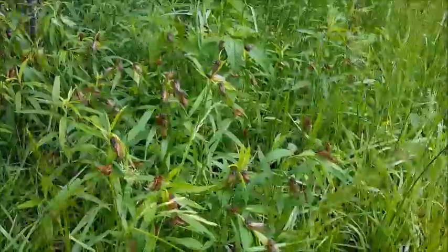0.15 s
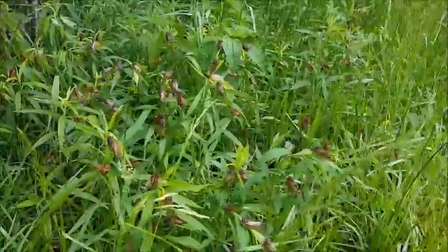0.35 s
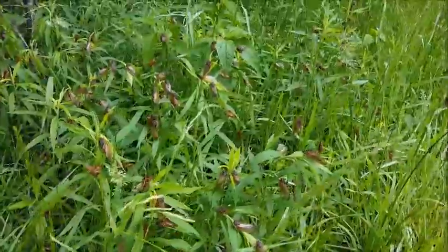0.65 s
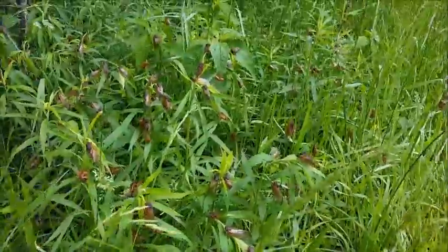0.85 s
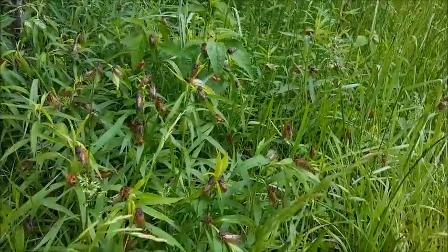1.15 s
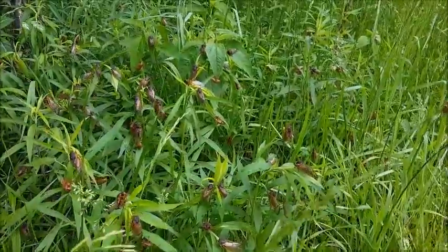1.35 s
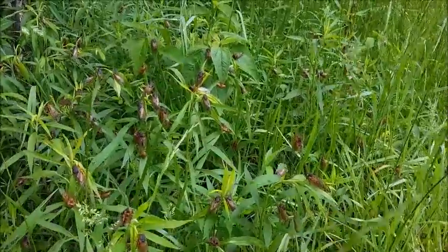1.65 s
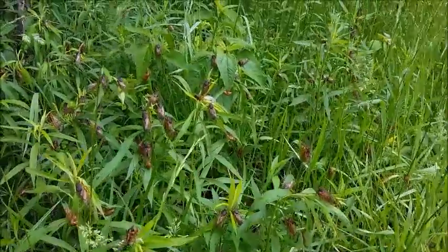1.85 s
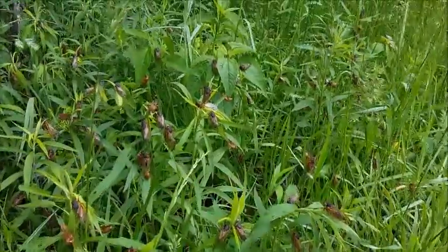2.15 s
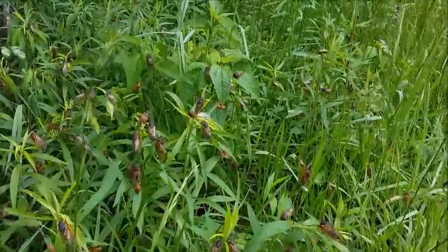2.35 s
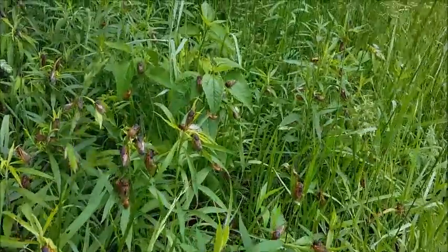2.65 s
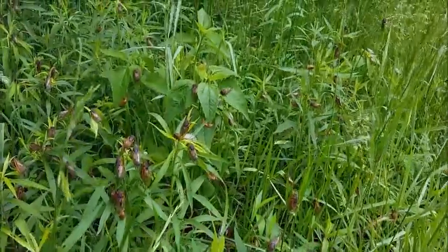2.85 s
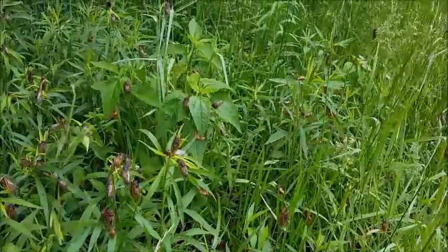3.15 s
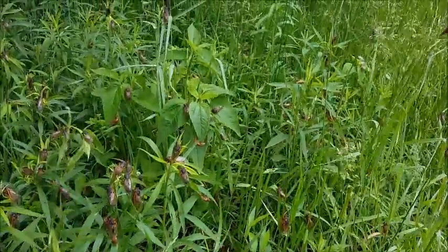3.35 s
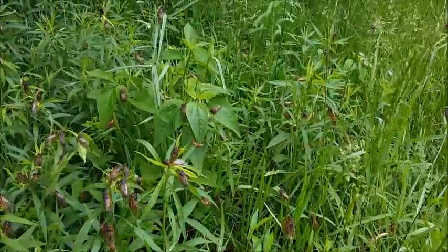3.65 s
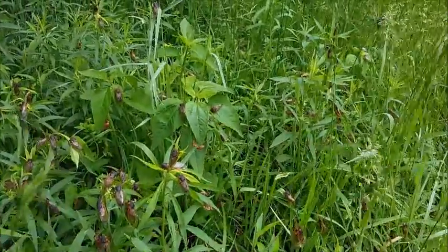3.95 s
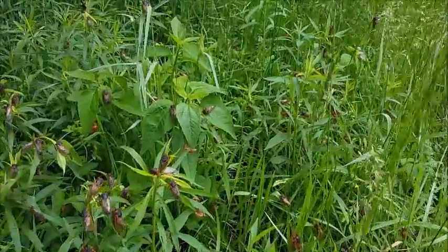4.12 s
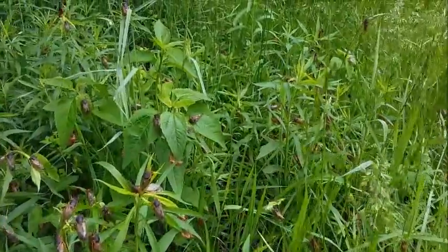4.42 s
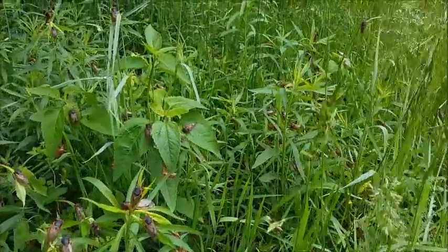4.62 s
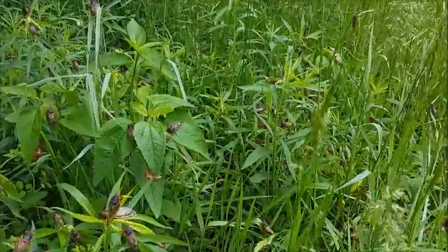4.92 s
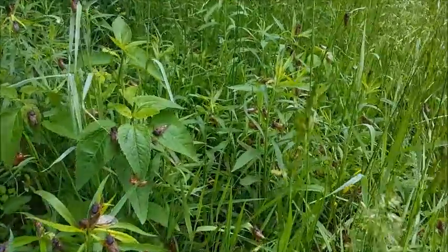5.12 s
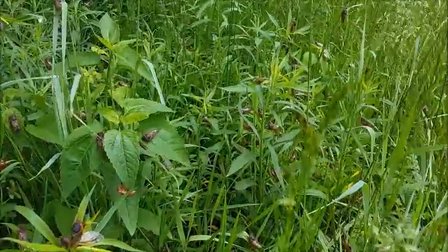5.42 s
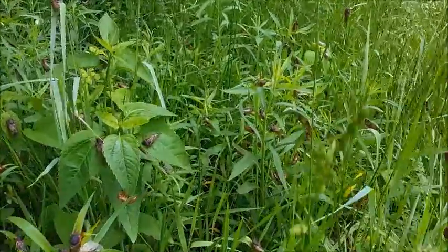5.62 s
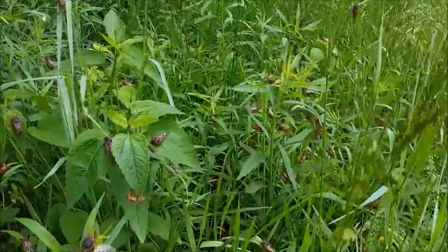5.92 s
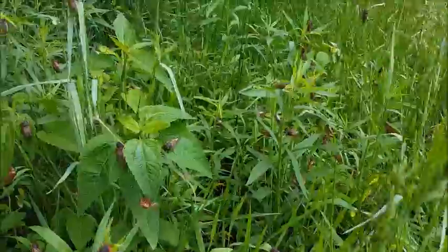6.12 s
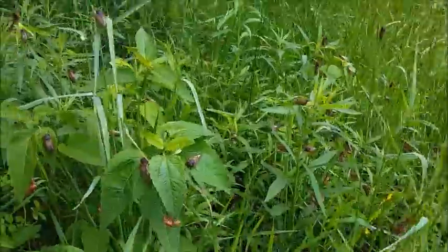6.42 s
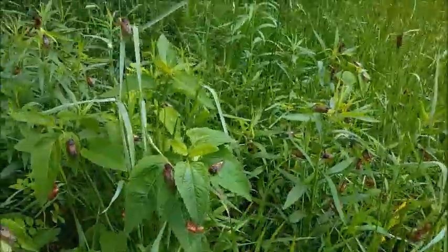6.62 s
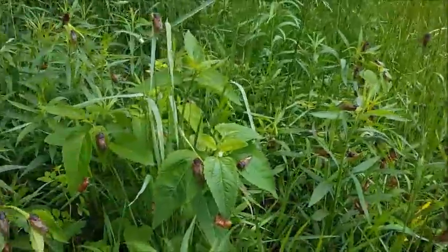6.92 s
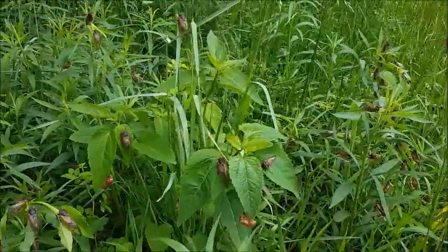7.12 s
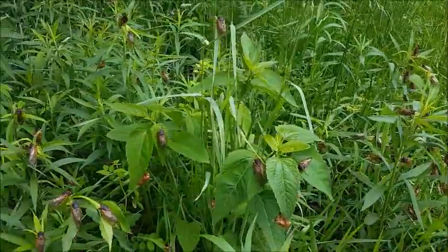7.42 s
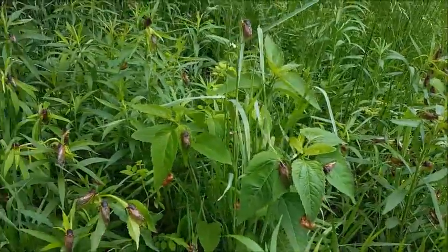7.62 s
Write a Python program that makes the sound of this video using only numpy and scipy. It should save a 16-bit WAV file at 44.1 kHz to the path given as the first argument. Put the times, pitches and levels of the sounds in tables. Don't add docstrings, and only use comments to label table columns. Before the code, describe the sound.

A hand-held microphone turns slowly among tall grass. Shrill cricket chirps, about four a second from one singer and slower from a second deeper in the grass, ride over a constant blurred cicada drone. Wind buffets the left briefly. Around the third second, brushed foliage crackles, snaps and swishes, with a few dull knocks. Distant birds whistle and buzz faintly, one mews, and traffic rumbles very low beneath.

```python
import sys
import numpy as np
from scipy import signal
from scipy.io import wavfile
from scipy.ndimage import uniform_filter1d

SR = 44100
rng = np.random.default_rng(int(sys.argv[2]) if len(sys.argv) > 2 else 0)


def convert_level_to_amplitude(level_db):
    exponent = np.asarray(level_db, float) / 20
    return 10 ** exponent


def store_pcm(level_fs):
    pcm = np.round(np.clip(level_fs, -1, 1) * 32767).astype(np.int16)
    wavfile.write(sys.argv[1], SR, np.atleast_2d(pcm).T)


N = 342657


def evened(x):
    return x / np.sqrt(np.mean(x ** 2) + 1e-20)


def read(points, hz):
    f, value = np.transpose(points)
    return np.interp(np.log(hz + 1), np.log(f + 1), value)


def curve(rows, column, t=np.arange(N) / SR):
    table = np.array(rows)
    return np.interp(t, table[:, 0], table[:, column])


def add(mix, s, sound):
    at = round(s * SR)
    part = mix[..., max(at, 0):max(at + sound.shape[-1], 0)]
    part += sound[..., max(-at, 0):][..., :part.shape[-1]]


def sides(pan_db):
    return convert_level_to_amplitude(np.array([[pan_db / 2], [-pan_db / 2]]))


def swells(peak_s, before_s, after_s, db, rest_db):
    late = np.arange(N)[::64, None] / SR - peak_s
    steps = np.where(late < 0, -late / before_s, late / after_s)
    power = convert_level_to_amplitude(2 * (db - 10 * steps)).sum(1)
    return np.repeat(np.sqrt(power + convert_level_to_amplitude(2 * rest_db)), 64)[:N]


def field(shape, patchy_db, stretch=1.):
    # f/Hz, coherence (-1..1)
    likeness = [(90, .75), (260, .7), (600, .42), (780, .4), (1120, -.03), (1460, -.3), (1850, 0),
                (2400, .2), (4000, 0)]
    # f/Hz, left-right level/dB
    tilt_points = [(60, 0.5), (130, -1.5), (290, 0), (640, -1.5), (1410, -2.5), (3100, -1.5), (6820, -6.5),
                   (15000, 0.5)]
    frames, hz = N // 256 + 5, np.fft.rfftfreq(1024, 1 / SR)[:, None]
    a, b, c, d, patches = rng.standard_normal((frames, 513, 5)).T
    patches = uniform_filter1d(patches, size=8, axis=0)
    patches = evened(uniform_filter1d(patches, size=20, axis=1))
    same = read(likeness, hz)
    left = a + 1j * b
    right = same * left + np.sqrt(1 - same ** 2) * (c + 1j * d)
    tilt = read(tilt_points, hz) / 2
    z = np.array([left * convert_level_to_amplitude(tilt), right * convert_level_to_amplitude(-tilt)])
    source_hz = hz / stretch
    z *= convert_level_to_amplitude(read(shape, source_hz) + patchy_db * patches)
    z *= (source_hz > shape[0][0]) * (source_hz < shape[-1][0])
    return evened(signal.istft(z, nperseg=1024, noverlap=768)[1][:, :N])


def meadow(x, t60, wet_db):
    size = SR // 2
    t = np.arange(size) / SR
    taps = rng.choice([-1., 1.], (2, size)) * (rng.random((2, size)) < .05)
    taps *= convert_level_to_amplitude(-60 * t / t60) * (t > .006)
    other_taps = taps * rng.choice([-1., 1.], taps.shape)
    sway = 2 * np.pi * 1.3 * np.arange(N) / SR
    wet = 0
    for share, h in ((np.cos(sway), taps), (np.sin(sway), other_taps)):
        wet = wet + signal.fftconvolve(x * share, h / np.linalg.norm(h[0]), axes=1)[:, :N]
    return convert_level_to_amplitude(wet_db) * wet


def cicadas():
    # t/s, level/dB, centre f/Hz
    chorus = [
        (0, -40.5, 1220),
        (.15, -43, 1260),
        (1.2, -44, 1254),
        (1.9, -44, 1290),
        (2.7, -45, 1293),
        (3.6, -43.5, 1257),
        (5.7, -43.5, 1297),
        (6.6, -42.5, 1320),
        (7.77, -44, 1274),
    ]
    # f/Hz, density level/dB per Hz
    drone_shape = [(560, -52), (950, -20.5), (1050, -13.5), (1260, 0), (1310, 6), (1350, -2), (1600, -19),
                   (1730, -24), (2000, -31.5), (2600, -63), (4400, -120)]
    # f/Hz, density level/dB per Hz
    ends_shape = [(680, -36), (780, -10.5), (840, 3), (900, -5.5), (1020, -9)]
    centre = curve(chorus, 2, np.arange(N // 256 + 5) * 256 / SR)
    drone = field(drone_shape, 0.82, 1 + 0.37 * (centre / centre.mean() - 1))
    ends = convert_level_to_amplitude(-20) * field(ends_shape, 0.99)
    return convert_level_to_amplitude(curve(chorus, 1) + 4.0) * (drone + ends)


def stroke(late_ms=-9., detune=1., lead_s=0.):
    # t/ms, f/Hz, level/dB
    sweep = [(-3, 5200, -30), (0, 5200, -11), (3, 5185, -3.5), (7, 5150, 1), (11, 5030, 1),
             (14.5, 4880, -1.5), (17.5, 4680, -7), (20, 4420, -14), (22.5, 4300, -32)]
    overtones_db = [2, -33.5, -32]
    ms = np.arange(-3, 23, 1000 / SR * (1 + .04 * rng.standard_normal()))
    hz = detune * curve(sweep, 1, ms) * (1 + 0.0029 * rng.standard_normal())
    turn = 2 * np.pi * (np.cumsum(hz) / SR + rng.random() + np.array([[0], [lead_s]]) * hz)
    tone = sum(convert_level_to_amplitude(db) * np.sin((k + 1) * turn) for k, db in enumerate(overtones_db))
    facing = convert_level_to_amplitude(np.array([[2.5], [11.]]) * (hz - 5050) / 1000)
    force = convert_level_to_amplitude(curve(sweep, 2, ms) + 0.37 * rng.standard_normal())
    onset = np.clip((ms - late_ms) / 7, 0, 1) ** 1.5
    return tone * facing * force * onset


def crickets():
    # t/s of 2nd stroke, left level/dB
    near_chirps = [(-.048, -45), (0.1884, -46.5), (0.43, -46), (0.699, -44), (0.9604, -42), (1.2184, -40.5),
                   (1.4619, -42.5), (1.6995, -42.5), (1.968, -40), (2.2214, -40.5), (2.4621, -40.5),
                   (2.7311, -42), (3.0122, -43), (3.4367, -42), (3.6721, -39.5), (4.0502, -42.5),
                   (4.3756, -40), (4.627, -44), (4.8687, -44.5), (5.1063, -44.5), (5.343, -46),
                   (5.6091, -44), (6.0071, -44), (6.235, -42), (6.4641, -40.5), (6.7387, -41.5),
                   (7.102, -45.5), (7.3447, -46), (7.5862, -47.5)]
    near_strokes = (0, .0336, .0686)
    # t/s, lead of right microphone/us
    bearing = [
        (0, 40),
        (4, 60),
        (5.3, 88),
        (6.5, 58),
        (7.1, 22),
        (7.7, -6),
    ]
    # t/s of 1st stroke, right level/dB
    second_chirps = [(-.04, -46.5), (.299, -49), (.725, -48), (1.071, -46.5), (1.391, -48), (2.061, -48),
                     (2.519, -48), (2.823, -45.5), (3.178, -45), (3.593, -44.5), (3.9, -45), (4.329, -44.5),
                     (4.701, -44.5), (5.154, -44), (5.497, -45.5), (5.854, -44.5), (6.161, -45.5),
                     (6.624, -46), (6.93, -47.5), (7.543, -46.5)]
    near_right_db, second_left_db, second_gap_s = -41, -55, .039
    near, second = np.zeros((2, 2, N))
    for s, db in near_chirps:
        lead_s = curve(bearing, 1, s) * 1e-6
        ears = convert_level_to_amplitude(np.array([[db], [near_right_db]]))
        add(near, s - .0335, ears * convert_level_to_amplitude(1.0) * stroke(8.8, lead_s=lead_s))
        for at in s + np.array(near_strokes):
            add(near, at - .003, ears * stroke(lead_s=lead_s))
    for s, db in second_chirps:
        for k, swell_db in enumerate([-2., .3, .3]):
            ears = convert_level_to_amplitude(np.array([[second_left_db], [db]]) + swell_db)
            add(second, s + k * second_gap_s - .003, ears * stroke(-2.0, 0.98, 27e-6))
    both = near + second + meadow(convert_level_to_amplitude(-7.5) * near + second, 0.066, -3.6)
    add(both, .0132, both[1] * convert_level_to_amplitude(np.array([[-19.], [-11.]])))
    heads = signal.lfilter(*signal.iirpeak(5100, 6., SR), both.mean(0))
    return both + sides(-9.0) * meadow(heads[None], 0.55, -9.5)


def far_cricket():
    # f/Hz, width/Hz, level/dB
    third = (5810, 160, -74)
    first_s, every_s = .27, .235
    hz, width, db = third
    shape = [(hz - 3 * width, -30), (hz - width, -8), (hz, 0), (hz + width, -8), (hz + 3 * width, -30)]
    cycle = np.cos(2 * np.pi * (np.arange(N) / SR - first_s) / every_s)
    return convert_level_to_amplitude(db + 4.8 * cycle) * field(shape, 1.7)


def grass():
    # t/s of peak, build-up/s, dying/s, swish level/dB, crackle level/dB
    brushes = [(1.23, .06, .06, -77, -75), (2.14, .12, 0.16, -70, -75), (2.6, 0.26, 0.088, -62.5, -72),
               (2.75, .08, .03, -59, -62.5), (2.83, 0.063, 0.035, -62, -64.5), (3.18, 0.33, 0.21, -71, -75),
               (3.44, 0.24, 0.22, -58, -80.5), (3.61, 0.186, 0.087, -54, -69), (3.96, 0.16, 0.22, -58, -76),
               (4.07, 0.097, 0.66, -59.5, -74.5), (4.68, 0.069, 2.5, -59.5, -84),
               (6.97, 0.04, .08, -71.5, -71)]
    # f/Hz, density level/dB per Hz
    swish_shape = [(1500, -19), (2200, 1.5), (2800, -2), (3600, -10.5), (4500, -12.5), (7000, -16.5)]
    # f/Hz, density level/dB per Hz
    crackle_shape = [(2500, -24), (3500, 5.5), (6000, -4), (8500, 2), (10500, -7), (13000, -2.5),
                     (15800, -6)]
    # t/s, peak level/dB, centre f/Hz, left-right level/dB
    snaps = [(2.5411, -48, 11800, -5.5), (2.5995, -48, 12200, -9), (2.6534, -46, 6800, -3.0),
             (2.6813, -43, 7850, -0.5), (2.7038, -39, 8070, 7), (2.7352, -42, 7600, -1),
             (2.7434, -53, 6820, -0.5), (2.7836, -40, 6910, -1.5), (2.824, -47, 7560, 0.0),
             (2.8414, -54, 7950, -3.0), (3.924, -43, 8630, -11), (4.5037, -46, 8000, -15),
             (4.5491, -45, 6780, -8.5), (4.589, -45, 8100, -19), (6.9441, -48, 8400, -14),
             (6.9611, -54, 7760, -14), (6.98, -40, 8210, -23)]
    # t/s, peak level/dB, centre f/Hz, left-right level/dB
    knocks = [
        (2.722, -48, 3680, 0),
        (2.733, -41, 3640, 0),
        (2.829, -36, 3600, 0),
        (2.841, -32, 3700, -3),
        (3.328, -33, 2430, 4.5),
        (3.342, -46, 566, 0),
        (3.618, -30, 1900, -10),
        (3.619, -41.5, 510, 0),
        (5.003, -35, 3120, -4),
    ]
    grains = convert_level_to_amplitude(1.8 * np.minimum(rng.exponential(1, (2, N)), 5)) * (rng.random((2, N)) < .03)
    grains = uniform_filter1d(grains + 0.56 * grains[::-1], size=40, axis=1)
    crackle = evened(field(crackle_shape, 0.59) * (0.53 + evened(grains)))
    s, before, after, swish_db, crackle_db = np.transpose(brushes)
    out = swells(s, before, after, swish_db, -64.5) * field(swish_shape, 2.3)
    out += convert_level_to_amplitude(8.5) * swells(s, before, after, crackle_db, -80) * crackle
    for rows, cycles, crack in ((snaps, 6., .6), (knocks, 3.2, .03)):
        for s, db, hz, pan_db in rows:
            turns = np.arange(400) / SR * hz
            tick = np.sin(2 * np.pi * turns) + crack * np.diff(rng.standard_normal(401))
            add(out, s, convert_level_to_amplitude(db - 7.5) * sides(pan_db) * tick * np.exp(-turns / cycles))
    return out


def note(length, pitch_hz, glide, db, rough):
    u = np.arange(round(length * SR)) / (length * SR)
    early = .8
    hz = pitch_hz + glide * (u ** early - .5 ** early)
    hz *= 1 + 0.0068 * rough * evened(uniform_filter1d(rng.standard_normal(len(u)), size=200))
    flutter = 1 + rough * evened(uniform_filter1d(rng.standard_normal(len(u)), size=60))
    return convert_level_to_amplitude(db + 3) * np.sin(2 * np.pi * np.cumsum(hz) / SR) * flutter * np.sin(np.pi * u) ** 0.17


def birds():
    # t/s, length/s, f/Hz, glide/Hz, level/dB
    whistles = [(.6, .075, 2410, -40, -66), (1.11, 0.069, 2750, -250, -62), (2.09, .083, 2254, -220, -64),
                (2.125, .04, 6800, 50, -75), (2.17, 0.153, 6230, -100, -74), (2.31, .22, 6475, -920, -75),
                (2.42, .12, 2730, 57, -73), (3.33, 0.057, 2410, -50, -64), (3.44, .015, 2660, 160, -57),
                (3.495, 0.024, 2720, 183, -56), (3.52, 0.094, 2517, -110, -65),
                (3.88, 0.045, 2356, -60, -64), (3.93, 0.042, 3000, -130, -57), (4.52, 0.063, 2250, 80, -67),
                (4.65, 0.026, 2900, 280, -58.5), (4.7, 0.27, 2420, 88, -70), (5.13, 0.093, 4170, -250, -67),
                (5.17, .04, 2870, -330, -59.5), (5.3, 0.035, 2530, -170, -60),
                (6.403, 0.023, 7330, 2400, -59.5), (7.05, 0.021, 2460, -110, -61.5),
                (7.623, .018, 3580, -700, -54.5), (7.643, .024, 3840, -720, -59),
                (7.66, .022, 3740, -320, -64)]
    # t/s, length/s, f/Hz, glide/Hz, level/dB
    buzzes = [(1.82, 0.033, 7040, 296, -75), (1.85, 0.092, 7600, 150, -73), (1.99, .11, 7200, -50, -74.5),
              (1.95, 0.133, 7900, 50, -77), (2.03, .08, 8350, 150, -81), (2.18, .05, 6640, 900, -74),
              (6.61, 0.083, 4020, -48, -69), (7.608, 0.014, 3200, -300, -66), (1.2, .083, 7200, -760, -79),
              (1.34, .11, 7550, 1350, -78), (1.36, .09, 7300, -850, -80)]
    # t/s, f/Hz, level/dB
    mew = [
        (5.91, 730, -75),
        (5.95, 785, -73.5),
        (6.01, 817, -77),
        (6.1, 759, -73),
        (6.18, 750, -77),
        (6.32, 708, -76),
    ]
    # harmonic number, level/dB
    mew_tones = [(5, -6), (8, 2), (9, -4), (10, -7), (11, -5.5)]
    dry, t = np.zeros((2, N)), np.arange(N) / SR
    for rows, rough in ((whistles, .3), (buzzes, 1.1)):
        for s, *shape in rows:
            pan_db = np.interp(shape[1], (3200, 5200), (-1.5, -15.))
            add(dry, s, note(*shape, rough) * sides(pan_db))
    shake = evened(uniform_filter1d(rng.standard_normal((6, N)), size=500, axis=1))
    turn = 2 * np.pi * np.cumsum(curve(mew, 1) * (1 + 0.0036 * shake[5])) / SR
    effort = (t > mew[0][0]) * (t < mew[-1][0]) * convert_level_to_amplitude(curve(mew, 2) - 0.2)
    voice = sum(convert_level_to_amplitude(db + 4.3 * w) * np.sin(k * turn) for (k, db), w in zip(mew_tones, shake))
    dry += sides(-19.0) * effort * voice
    return dry + meadow(dry, 0.6, 0.0038)


def wind():
    # t/s of peak, width/s, level/dB
    gusts = [
        (1.62, 0.11, -48),
        (2.33, 0.054, -42.5),
        (4.65, 0.25, -55),
        (5.7, 0.49, -62),
        (6.66, 0.061, -63),
        (7.77, .1, -62),
    ]
    # f/Hz, density level/dB per Hz
    wind_shape = [(15, -25), (42, 2), (60, 18), (110, -4.5), (200, -30)]
    s, width, db = np.transpose(gusts)
    breeze_db = -74.5
    return swells(s, width, width, db, breeze_db) * convert_level_to_amplitude(np.array([[3.], [-9.]])) * field(wind_shape, 6.2)


def rumble_and_air():
    # f/Hz, density level/dB per Hz
    rumble_shape = [(12, -34), (20, -4), (27, -19), (81, 0.5), (233, -8.5), (397, -15.5), (644, -13.5),
                    (750, -12.5), (980, -48), (1650, -120)]
    # f/Hz, density level/dB per Hz
    air_shape = [(1600, -7), (2000, 1), (2600, -4), (3200, -15), (4200, -9), (5200, 3), (6200, -16),
                 (8000, -13), (9700, -13.5), (10600, -22.5), (12000, -20.5), (15700, -19)]
    return convert_level_to_amplitude(-59) * field(rumble_shape, 1.57) + convert_level_to_amplitude(-61.5) * field(air_shape, 0.97)


def scene():
    return cicadas() + crickets() + far_cricket() + grass() + birds() + wind() + rumble_and_air()


def band_limit(x):
    return signal.sosfilt(signal.butter(12, 15790, fs=SR, output="sos"), x)


def record(dry):
    mix = dry - .00059
    return band_limit(mix)


dry = scene()
out = record(dry)
store_pcm(out)
```